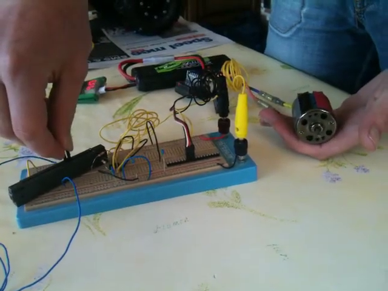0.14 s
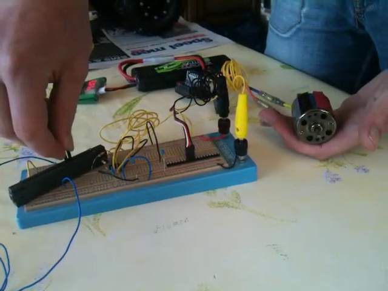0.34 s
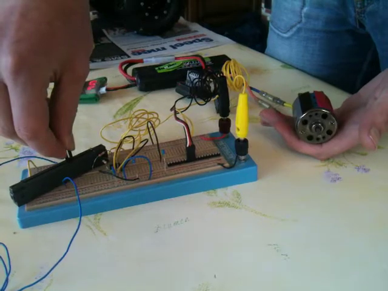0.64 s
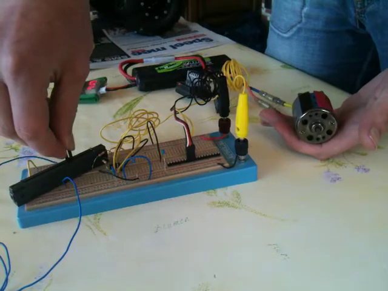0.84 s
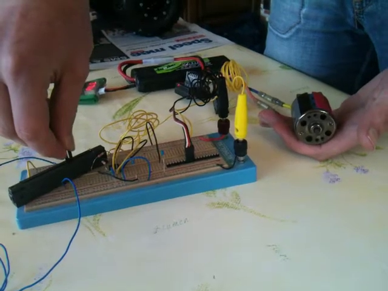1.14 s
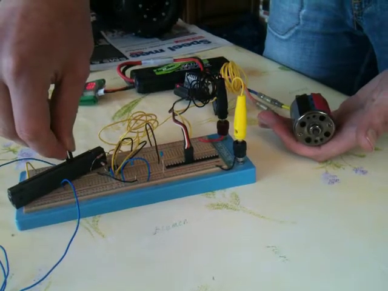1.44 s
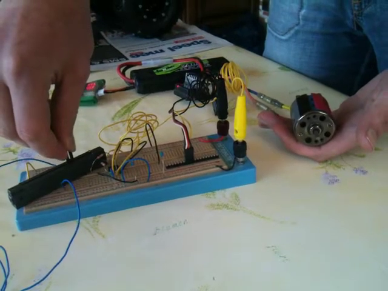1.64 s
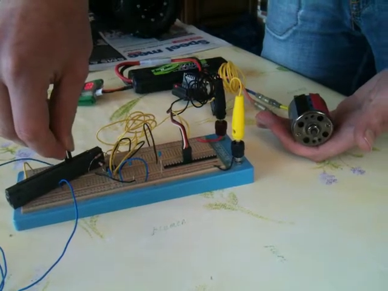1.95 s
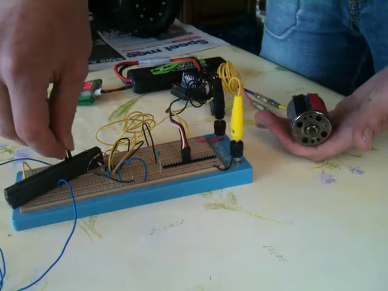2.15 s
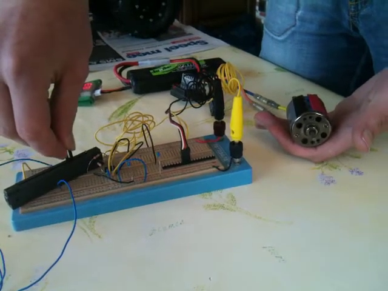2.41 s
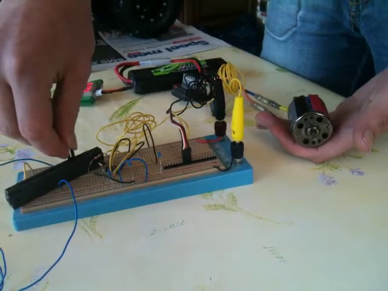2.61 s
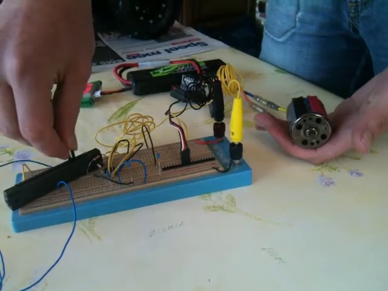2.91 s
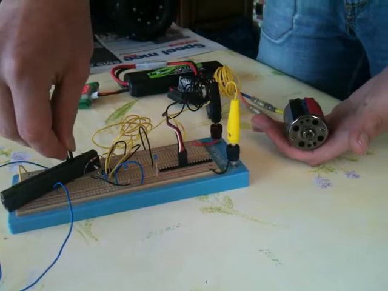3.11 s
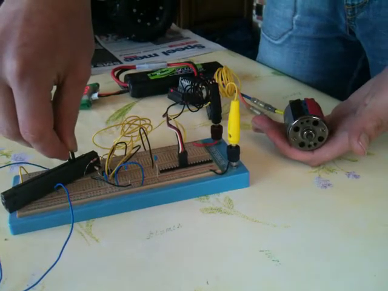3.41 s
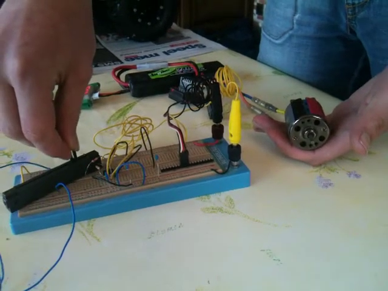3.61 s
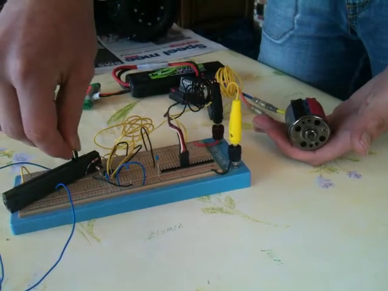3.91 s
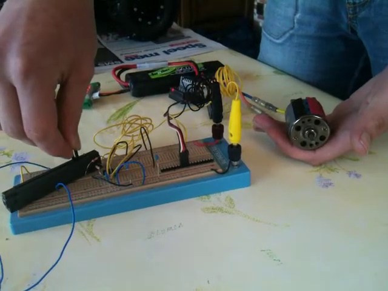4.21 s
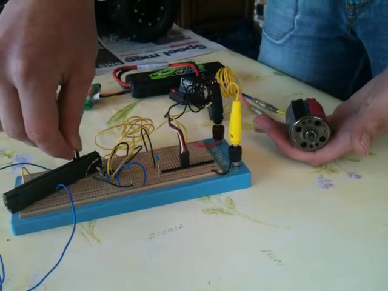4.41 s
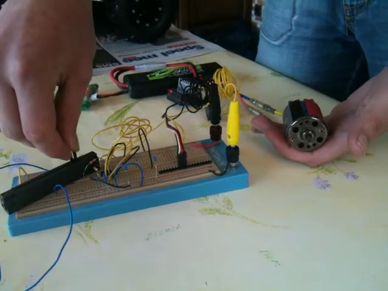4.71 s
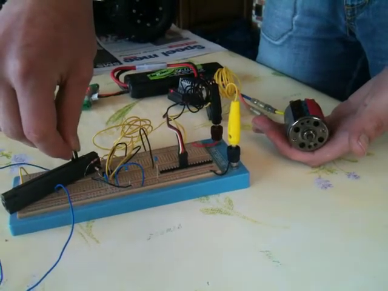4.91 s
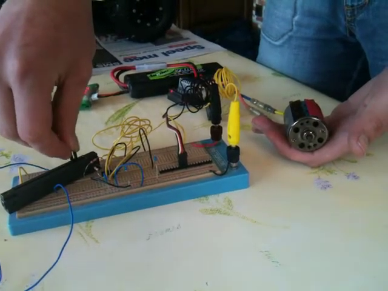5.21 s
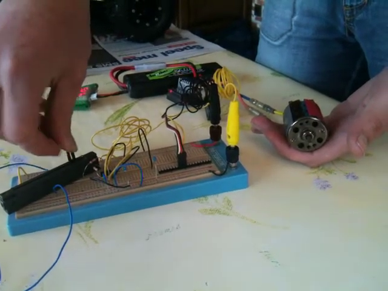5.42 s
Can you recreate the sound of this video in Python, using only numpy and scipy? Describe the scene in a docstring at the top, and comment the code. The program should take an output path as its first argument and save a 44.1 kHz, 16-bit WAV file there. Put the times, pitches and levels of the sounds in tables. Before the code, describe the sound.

A small electric motor, held in a hand, is running slowly from the start and speeds up. For the first 2.8 seconds its loose rotor jolts against the metal casing in quick, uneven, bright taps over a light rattle, while a thin whine climbs in pitch and grows stronger. At about 1.4 seconds a faint, dull thud sounds across the room. Just before 3 seconds the rattle suddenly becomes a louder, dense, hissing metallic rasp, and the whine keeps rising. Around 4.3 seconds the motor reaches full speed; the rasp falls away, leaving a steady high whine with a fast, even buzz. At about 5.5 seconds, right at the end, the pitch dips slightly and the rattle flares again. The background is the faint hush of a quiet room.

```python
"""A thin whine climbs over a jolting metallic rattle, then holds: a small brushless motor in a palm,
turned up by a knob. Magnetic pull makes the whine. The loose rotor rattles in its metal can and jolts
at each step of the speed control, until at full speed it settles into one knock pattern a turn.
Behind it is a quiet room with one soft thud."""
import sys
import numpy as np
from scipy import signal
from scipy.fft import rfft, irfft
from scipy.io import wavfile
from scipy.ndimage import uniform_filter1d, map_coordinates

SR = 44100
rng = np.random.default_rng(int(sys.argv[2]) if len(sys.argv) > 2 else 0)


def generate_wav(sig):
    """Save sig (samples, or channels by samples) to the path in sys.argv[1] as 16-bit PCM at SR."""
    pcm = np.round(np.clip(np.atleast_2d(sig).T, -1, 1) * 32767).astype(np.int16)
    wavfile.write(sys.argv[1], SR, pcm)


N = 244755

# Tones of the magnetic pull: (cycles a turn, level at middle speed [dB], rise [dB per doubling of speed],
# flutter [dB], level once the speed holds [dB])
MAGNETIC_TONES = [(6, -78.5, 18, 3, -73), (8, -85, 4, 2, -95), (12, -76, 13, 3, -80),
                  (18, -68.5, 32, 2.5, -56.5), (22, -82, 14, 3, -81), (24, -69.5, 22, 2, -74),
                  (30, -82.5, 14, 3, -82), (36, -82, 18, 4, -58.5), (42, -69, 6, 3, -80),
                  (48, -69, 10, 4, -52)]
TICK_TURN = .82  # where in the turn the rotor ticks


def gain_of(db):
    return 10 ** (np.asarray(db) / 20)


def unit_rms(x):
    return x / np.sqrt(np.mean(x ** 2) + 1e-20)


def curves(rows):
    """One curve per column after the time, one value a sample."""
    times, *columns = np.transpose(rows)
    return [np.interp(np.arange(N) / SR, times, column) for column in columns]


def spectrum_db(points, hz):
    """Level between (Hz, dB) points on a log frequency axis."""
    point_hz, db = np.transpose(points)
    return np.interp(np.log(hz + 1), np.log(point_hz + 1), db)


def coloured(x, points):
    """Equalises x with the curve through the points."""
    return irfft(rfft(x) * gain_of(spectrum_db(points, np.fft.rfftfreq(len(x), 1 / SR))), len(x))


def can_db(hz):
    """Resonance of the metal can: a broad ring with sharper modes on top."""
    # Broad ring: (frequency [Hz], level [dB])
    body = [(880, -69), (1500, -34), (2070, -24), (2260, -28), (2640, -22), (3000, -30), (3760, -31.5),
            (4270, -19.5), (5500, -13.5), (6620, -1.5), (10700, -19), (12700, 4.5), (14300, -10),
            (15100, -79.5), (15500, -70)]
    # Modes: (frequency [Hz], width [Hz], boost [dB])
    modes = [(2607, 65, 5), (4280, 160, 4.5), (4920, 140, 6), (6130, 71, 1.5), (6714, 71, 6.5),
             (7730, 89, 5.5), (10560, 330, 7), (12870, 370, 7.5)]
    return spectrum_db(body, hz) + sum(db / (1 + (2 * (hz - f) / width) ** 2) for f, width, db in modes)


def can_rings(sharpness=1, split_hz=10500):
    """One tap on the can: its lower ring and its top ring, each of unit energy."""
    hz = abs(np.fft.fftfreq(4096, 1 / SR))
    crossover_db = 40 * np.tanh((hz - split_hz) / 400)
    bands_db = [sharpness * can_db(hz) - np.maximum(side * crossover_db + 6, 0) for side in (1, -1)]
    log_gain = np.log(gain_of(np.maximum(bands_db, -100)))
    minimum_phase = np.exp(np.conj(signal.hilbert(log_gain)))
    rings = np.fft.ifft(minimum_phase, axis=1).real[:, :2048]
    return rings / np.linalg.norm(rings, axis=1, keepdims=True)


def whine(turns, speed, flutter_s=.05, held_flutter_db=1.2):
    """Magnetic pull on the poles: shaft-locked tones grow with speed, swell in the modes, then steady."""
    middle_speed, hold_from, hold_full = 100, 122.6, 126.8  # turns per s
    can_from_hz, hand_hz, hand_width_hz, hand_db = 2000, 720, 120, 7.5
    frames, span = np.arange(0, N, 64), round(flutter_s * SR / 64)
    held = np.clip((speed[frames] - hold_from) / (hold_full - hold_from), 0, 1)
    out = np.zeros(N)
    for order, db, rise_db, flutter_db, held_db in MAGNETIC_TONES:
        order = round(order)
        hz, middle_hz = order * speed[frames], order * middle_speed
        flutter = unit_rms(uniform_filter1d(uniform_filter1d(rng.standard_normal(len(frames)), span), span))
        swell_db = can_db(np.maximum(hz, can_from_hz)) - can_db(max(middle_hz, can_from_hz))
        swell_db += hand_db / (1 + (2 * (hz - hand_hz) / hand_width_hz) ** 2)  # motor and hand resonate
        rising_db = db + rise_db * np.log2(hz / middle_hz) + swell_db + flutter_db * np.minimum(flutter, 1.5)
        level = gain_of((1 - held) * rising_db + held * (held_db + held_flutter_db * flutter))
        tone = np.sqrt(2) * np.cos(2 * np.pi * (order * turns + rng.random()))
        out += np.interp(np.arange(N), frames, level) * tone
    return out


def rattle(turns, burst_s=.003):
    """The rotor skips in short bursts of taps, most often twice a turn, over the hiss of the bearings."""
    # Rattle in the can: (time [s], lower ring [dB], top ring [dB])
    levels = [(0.0, -58, -61), (0.15, -53.5, -63), (0.3, -61, -65), (0.45, -51.5, -59), (1.6, -51.5, -60),
              (1.9, -48.5, -51), (2.55, -48, -51), (2.92, -48, -52.5), (2.945, -36, -32),
              (3.05, -37.5, -35), (3.9, -38.5, -34), (4.12, -39, -36.5), (4.28, -44.5, -43),
              (4.42, -49, -45), (4.55, -54, -56), (4.68, -53, -54), (4.78, -51, -45), (4.9, -52, -54),
              (5.02, -47.5, -44), (5.5, -47, -43.5), (5.55, -38.5, -38)]
    # Skips of the rotor: (time [s], base rate [1/s], strength over the hiss, size spread [dB])
    skips = [(0, 130, 1.45, 1), (1.7, 135, 1.15, 1.2), (2.9, 170, 0.8, 1.2), (2.95, 520, 0.7, -1.5),
             (4.2, 420, 0.55, .6), (4.45, 240, 0.53, 0), (5.55, 240, 0.83, 1.5)]
    per_s, strength, spread_db = curves(skips)
    angle = 2 * np.pi * (turns - TICK_TURN)
    sway = gain_of(0.4 * np.cos(angle) + 1.02 * np.cos(2 * angle))
    sizes = strength * gain_of(spread_db * np.minimum(rng.exponential(1, N), 3))
    onsets = rng.random(N) < per_s * sway / SR
    bursts = signal.oaconvolve(sizes * onsets, np.hanning(round(burst_s * SR)), "same")
    grit = rng.standard_normal(N) * gain_of(1.2 * rng.exponential(1, N))  # taps of uneven size
    hiss = rng.standard_normal((2, N))
    taps = sway * (bursts * unit_rms(grit) + hiss)
    taps /= np.sqrt(uniform_filter1d(taps ** 2, 8192, axis=1))  # even out the slow loudness
    taps *= gain_of(curves(levels))
    return sum(signal.oaconvolve(band, ring)[:N] for band, ring in zip(taps, can_rings()))


def room(level_db=-68):
    """Room tone: a hush that drifts a little in patches of time and pitch."""
    # Hush with a faint hum near 500 Hz: (frequency [Hz], relative level [dB])
    colour = [(35, -56), (60, -30), (205, -2), (437, -5.5), (478, -3.5), (496, 4), (515, -3.5), (655, -6),
              (1150, -4), (2280, -14), (2620, -4), (3240, -12), (4000, -5), (5200, -55), (8800, -120)]
    _, _, hush = signal.stft(coloured(rng.standard_normal(N), colour), SR, nperseg=1024)
    patches = unit_rms(uniform_filter1d(uniform_filter1d(rng.standard_normal(hush.shape), 14, 0), 8, 1))
    _, drifting = signal.istft(hush * gain_of(1.84 * patches), SR, nperseg=1024)
    return gain_of(level_db) * unit_rms(drifting[:N])


def jolts():
    """Each step of the control throws the rotor at the can: taps swell, then fade with a short tail."""
    # Blows on the can: (time [s], lower ring peak [dB], top ring peak [dB])
    blows = [(.0408, -42, -36), (.108, -42, -51), (.1239, -34, -28), (.2241, -34, -33), (.3078, -30, -33),
             (.3578, -33, -36), (.4087, -36, -22), (.4412, -37, -35), (.475, -37, -31), (.5754, -38, -29),
             (.6419, -29, -30), (.6755, -33, -29), (.7093, -36, -24), (.7418, -32, -32), (.7756, -36, -25),
             (.8089, -31, -32), (.8778, -34, -30), (.9093, -35, -27), (.9421, -32, -37), (.9786, -35, -29),
             (1.009, -39, -30), (1.0427, -31, -32), (1.1098, -39, -36), (1.1429, -33, -36),
             (1.2101, -31, -33), (1.2429, -34, -32), (1.2765, -35, -28), (1.3102, -32, -26),
             (1.3771, -33, -31), (1.4098, -37, -33), (1.4761, -35, -41), (1.5099, -30, -34),
             (1.5434, -37, -38), (1.5777, -37, -34), (1.6098, -34, -34), (1.6434, -34, -32),
             (1.6769, -33, -27), (1.7098, -37, -36), (1.777, -36, -33), (1.8114, -34, -37),
             (1.8768, -35, -41), (1.9448, -34, -32), (1.9766, -36, -37), (2.0109, -34, -37),
             (2.0703, -38, -38), (2.1099, -34, -33), (2.1765, -37, -40), (2.2289, -35, -32),
             (2.3085, -36, -43), (2.3274, -30, -31), (2.3941, -37, -40), (2.5264, -33, -30),
             (2.6261, -36, -37), (2.7606, -37, -38)]
    t, out = np.arange(1500) / SR, np.zeros(N + 4000)
    rings = can_rings(sharpness=1.07)  # a hard blow brings out the main modes
    for (at_s, low_db, top_db), taps in zip(blows, rng.standard_normal((len(blows), len(t)))):
        length_s = max(.005 + .00012 * (low_db - top_db) + .0008 * at_s, .002)  # longer if dull or late
        attack = np.sin(np.pi / 2 * np.minimum(t / (.65 * length_s), 1)) ** 2
        decay = np.exp(-(t / (0.95 * length_s)) ** 3) + 0.24 * np.exp(-t / 0.0085)
        rung = signal.fftconvolve(rings, (attack * decay * taps)[None], axes=1)
        peaks = np.sqrt(2 * uniform_filter1d(rung ** 2, 40, axis=1).max(1))
        start = round((at_s - .34 * length_s) * SR)  # the swell begins just before it is heard
        out[start:][:rung.shape[1]] += gain_of([low_db, top_db]) / peaks @ rung
    return out[:N]


def thud(at_s=1.366, level_db=-52.5, attack_s=0.016, t60_s=0.65):
    """Something soft lands across the room; the boom builds up and dies in the walls."""
    # Dull boom: (frequency [Hz], relative level [dB])
    colour = [(71, -34), (120, -16), (246, -4.5), (349, -4), (384, -18), (701, -13), (755, -18),
              (1500, -27), (1950, -54), (3300, -120)]
    t = np.maximum(np.arange(N) / SR - at_s, 0)
    envelope = gain_of(level_db - 60 * t / t60_s) * (1 - np.exp(-t / attack_s))
    boom = coloured(envelope * rng.standard_normal(N), colour)
    return boom * np.linalg.norm(envelope) / np.linalg.norm(boom)


def knock_partials(top_speed, fill_db=-54, octave_tilt_db=-6.5, spread_db=4.5):
    """Shaft harmonics of the knock: the signature ones, and a fill that follows the ring of the can."""
    # Partials that give the knock its character: (cycles a turn, level [dB])
    signature = [(4, -81), (9, -84), (10, -79), (11, -84), (14, -74), (17, -79), (20, -73), (21, -77),
                 (25, -77), (27, -79), (28, -73), (29, -84), (32, -81), (37, -65), (42, -65), (43, -65),
                 (51, -60), (53, -51), (54, -50), (55, -63), (56, -55), (57, -52), (58, -52), (59, -52),
                 (60, -49), (61, -58), (62, -57), (64, -59), (70, -64), (71, -64), (72, -63), (75, -64),
                 (80, -65), (86, -64), (88, -58), (92, -63), (96, -62), (98, -62), (99, -75), (100, -54),
                 (101, -51), (102, -50), (103, -53), (104, -58), (109, -64), (113, -66), (114, -68),
                 (120, -72)]
    orders = np.arange(34, 112)
    db = fill_db + octave_tilt_db * np.log2(orders / orders[0]) + can_db(orders * top_speed)
    fill = dict(zip(orders, db + spread_db * rng.standard_normal(len(orders))))
    for order, *_ in MAGNETIC_TONES:
        fill.pop(round(order), None)  # leave room for the whine
    return np.transpose(sorted({**fill, **dict(signature)}.items()))


def knocks(turns, speed):
    """The rotor settles into the same knocks every turn: a tick rings the can amid the pole passings."""
    # Settling of the pattern: (time [s], gain [dB], timing scatter [turns])
    settling = [(2.0, -22, 0.0092), (2.9, -13, 0.002), (4.15, -7.5, 0.0013), (4.3, -3.5, 0.001),
                (4.45, 0.5, 0.00035), (4.95, 0.8, 0.00034), (5.1, -.5, 0.00054), (5.46, -0.2, 0.00074),
                (5.55, -4, 0.0031)]
    gain_db, scatter = curves(settling)
    wobble = scatter * unit_rms(uniform_filter1d(rng.standard_normal(N), 500))  # ticks land early or late
    orders, db = knock_partials(speed.max())
    top_hz, hop, turn_points = orders * speed.max(), 1024, 4096
    tap_phase = np.angle(rfft(can_rings().sum(0), SR)[top_hz.round().astype(int)])  # one bin per Hz
    pole_phase = 2 * np.pi * rng.random(len(orders))
    phase = np.where(orders % 12 == 0, pole_phase, tap_phase + 0.42 * rng.standard_normal(len(orders)))
    slide_db = can_db(orders * speed[::hop, None]) - can_db(top_hz)  # partials slide through the modes
    spectra = np.zeros((len(slide_db), turn_points // 2 + 1), complex)
    spectra[:, orders.astype(int)] = gain_of(db + np.minimum(slide_db, 6)) * np.exp(1j * phase)
    wavetable = irfft(spectra, turn_points) * turn_points / np.sqrt(2)  # one turn for each hop
    wavetable = np.append(wavetable, wavetable[:, :1], axis=1)  # close the loop
    place = (turns - TICK_TURN + wobble) % 1 * turn_points
    pattern = map_coordinates(wavetable, [np.arange(N) / hop, place], order=1, mode="nearest")
    return gain_of(gain_db) * pattern


def scene():
    """The motor spins up in the quiet room, in mono."""
    # Spin-up of the shaft: (time [s], speed [turns/s])
    spin_up = [(0, 42), (1.15, 52.8), (1.3, 56.4), (1.6, 68.3), (1.85, 74.8), (2.2, 81.7), (2.4, 88.9),
               (2.65, 95.9), (3.1, 106.4), (3.3, 110.3), (3.85, 119), (4.175, 122.6), (4.21, 125.2),
               (4.25, 126.5), (4.31, 127.1), (5.47, 127.1), (5.52, 124.1), (5.55, 123)]
    speed, = curves(spin_up)
    turns = np.cumsum(speed) / SR
    motor = whine(turns, speed) + knocks(turns, speed) + rattle(turns) + jolts()
    return (motor + thud() + room())[None]


def record(dry):
    """A steep low-pass trims the air above 15.6 kHz."""
    low_pass = signal.firwin(511, 15600, window=("kaiser", 9), fs=SR)
    return signal.oaconvolve(dry, low_pass[None], "same")


dry = scene()
out = record(dry)
generate_wav(out)
```